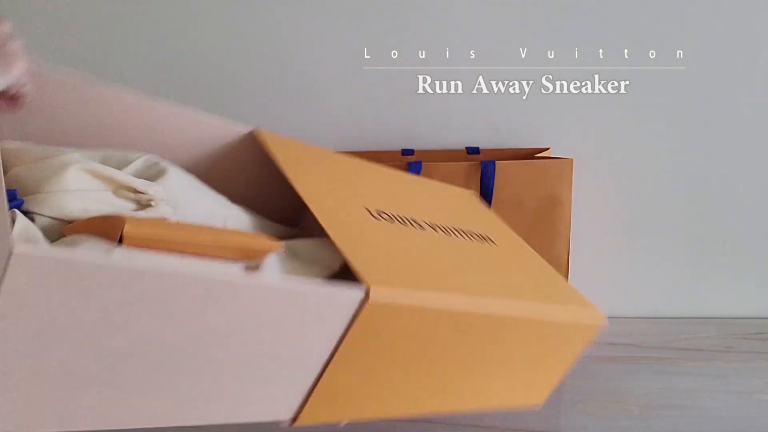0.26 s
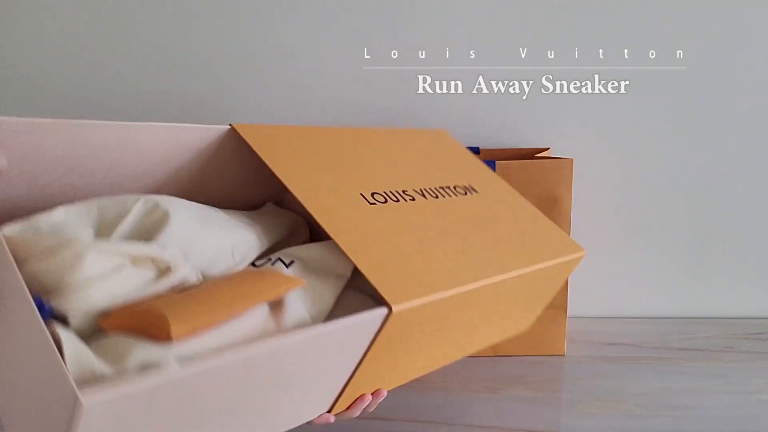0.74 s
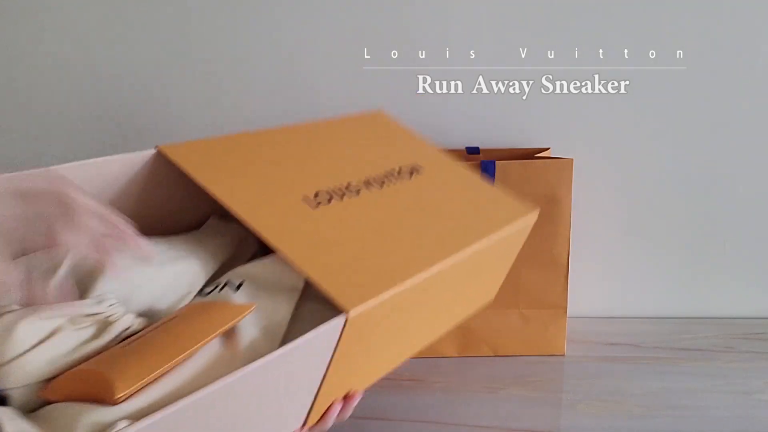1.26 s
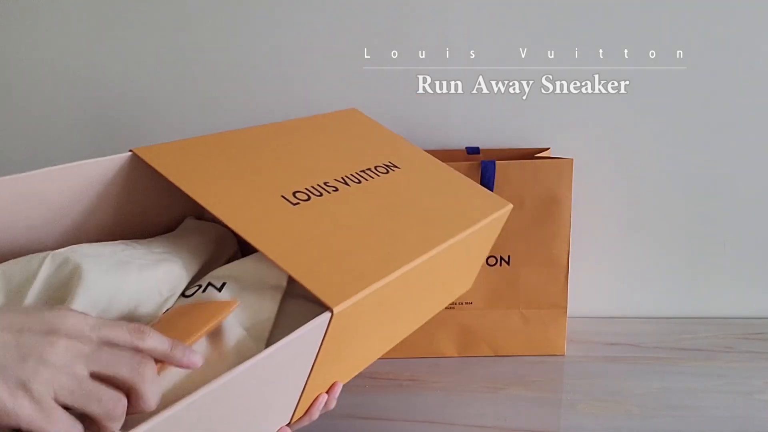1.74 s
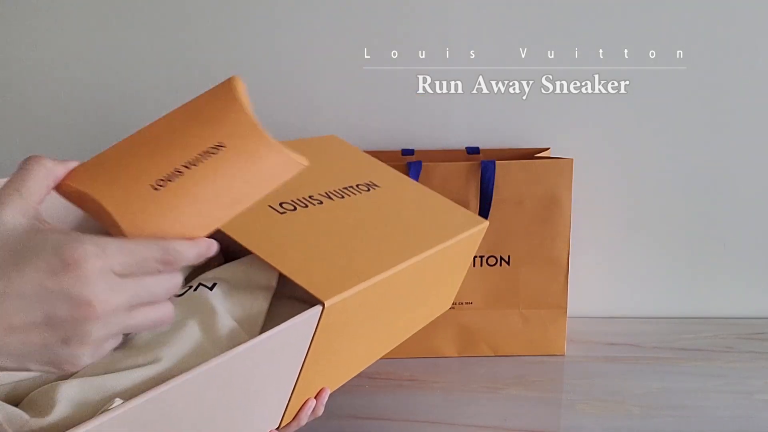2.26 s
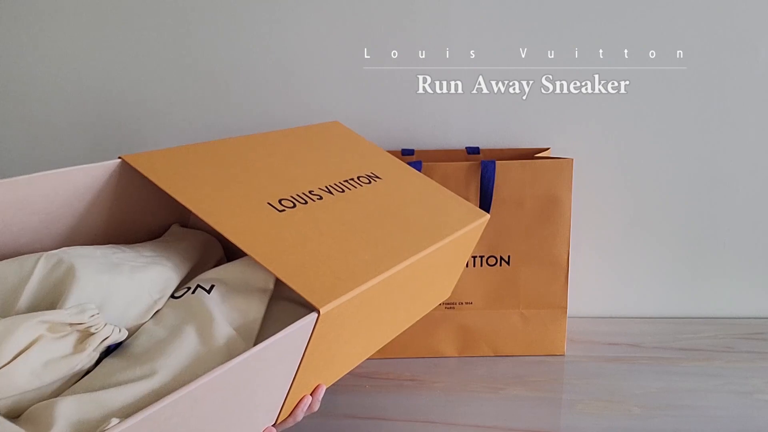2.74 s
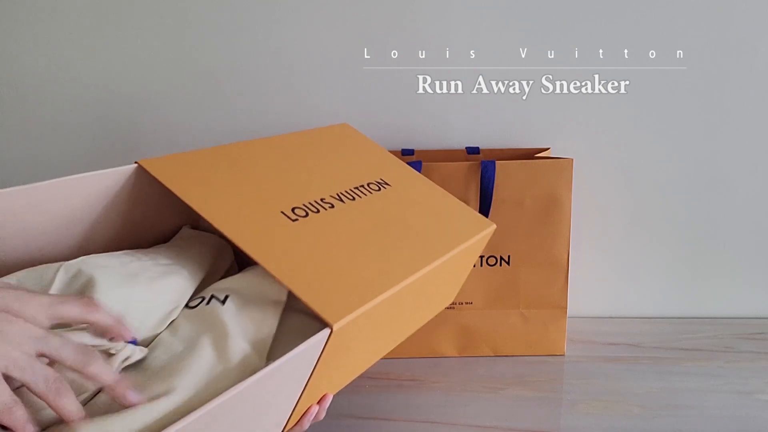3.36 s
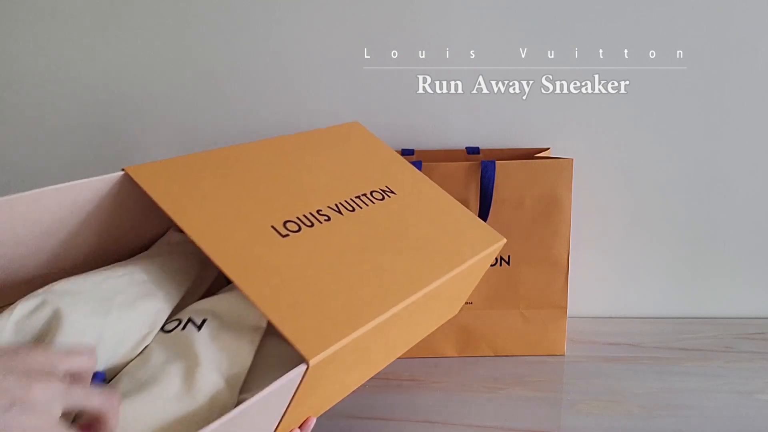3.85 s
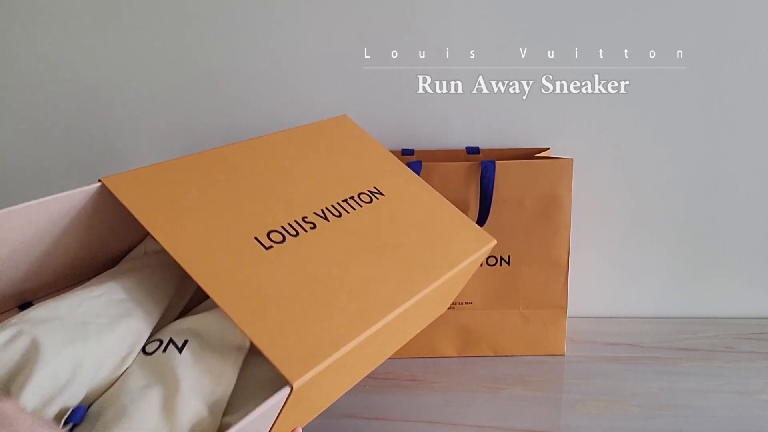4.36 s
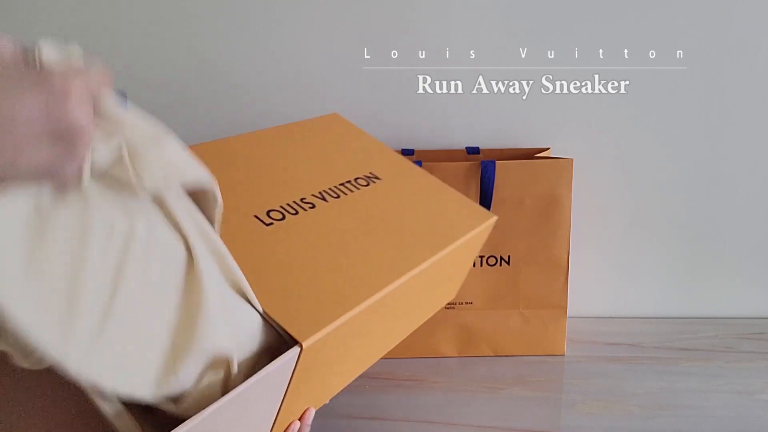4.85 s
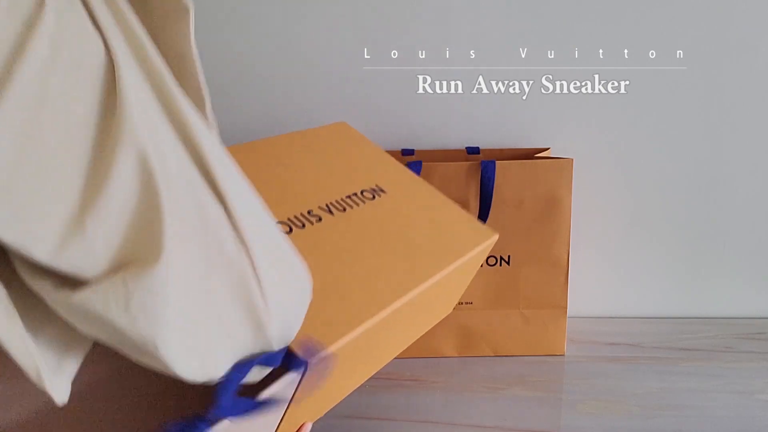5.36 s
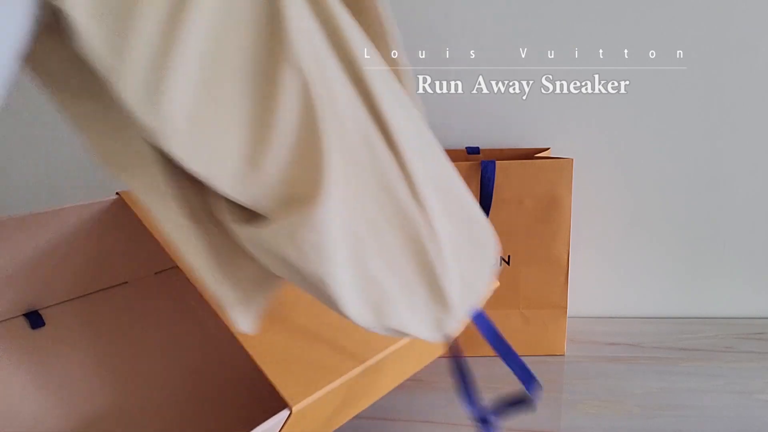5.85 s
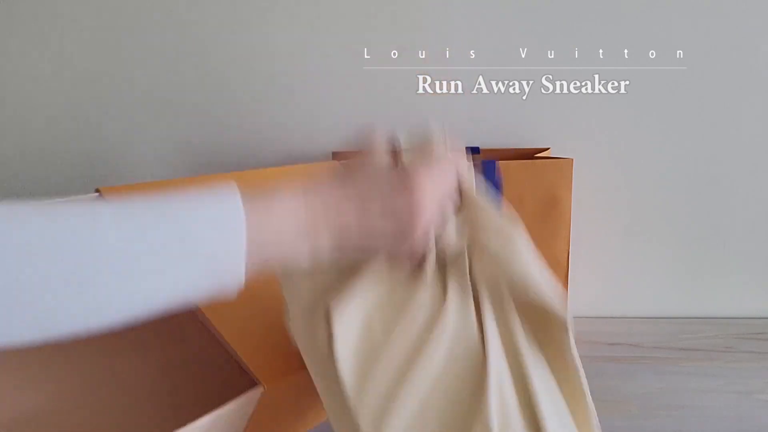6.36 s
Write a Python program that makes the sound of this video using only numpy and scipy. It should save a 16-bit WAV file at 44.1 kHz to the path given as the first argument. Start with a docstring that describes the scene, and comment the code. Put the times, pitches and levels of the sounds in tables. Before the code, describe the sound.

Close handling of a stiff gift box indoors: first a short card-on-card scrape, then small rustles, ticks and dabs of friction. A folded card wallet smacks down on a tabletop and skids. A quieter pause holds soft fabric shifting, one dull thud and a sharp tick, before a cloth bag scuffs along the box wall in bursts, bumping it hollowly. Dry small room, faint rumble, with a dull left side and a crisp right side.

```python
"""A stiff cardboard drawer box is slid open and handled in a quiet room: stick-slip friction and knocks ring its modes.
Card and cloth rub over it as coloured grains of noise: hiss, rasp and grit, with ticks and snags as short puffs.
A small card wallet is lifted out and dropped on the table: ringing modes, crackling clicks and a short skid.
Then a cotton bag is dragged out along the box wall, in separate strokes of friction.
Two unlike microphones: the left one muffled and bassy with a thin hiss of its own, the right one bright."""
import sys
import numpy as np
from scipy import signal
from scipy.fft import rfft, irfft
from scipy.io import wavfile

SR = 44100
rng = np.random.default_rng(int(sys.argv[2]) if len(sys.argv) > 2 else 0)


def transcribe(signal):
    """Save signal, clipped to [-1, 1], as a 16-bit WAV file at the path in sys.argv[1]."""
    frames = np.atleast_2d(signal).T
    limited = np.clip(frames, -1, 1)
    pcm = np.round(limited * 32767).astype(np.int16)
    wavfile.write(sys.argv[1], SR, pcm)


N = 291743

CAVITY_HZ = 370   # hardness tilts the modes around this pitch
INSTANT_DB_PER_S, FLOOR_DB = 1e5, -200   # the rise of a sudden grip; lowest level of a gesture


def amp(db):
    """Decibels to a linear gain."""
    return 10 ** (np.asarray(db) / 20)


def rms_one(x):
    """Scale to an rms of 1."""
    return x / np.sqrt(np.mean(x ** 2) + 1e-20)


def lowpass(order, hz):
    """Butterworth low-pass sections."""
    return signal.butter(order, hz, fs=SR, output="sos")


def in_time(rows):
    """Columns of a curve, one value per sample."""
    s, *columns = np.transpose(rows)
    return [np.interp(np.arange(N) / SR, s, c) for c in columns]


def on_bins(points):
    """A (frequency [Hz], level [dB]) table read at the bins of a short filter."""
    hz, db = np.transpose(points)
    return np.interp(np.log(np.fft.rfftfreq(8192, 1 / SR) + 1), np.log(hz), db)


def colour(x, db):
    """Causal filter of the given response: minimum phase from the folded cepstrum."""
    cepstrum = irfft(np.log(amp(db)))
    half = len(cepstrum) // 2
    cepstrum[1:half] *= 2
    cepstrum[half + 1:] = 0
    impulse = irfft(np.exp(rfft(cepstrum)))[:half]
    return signal.oaconvolve(x, impulse)[:N]


def grains(per_s, spread_db):
    """Random slips of uneven size and sign; rms 1."""
    sizes = amp(spread_db * np.minimum(rng.exponential(1, N), 4))
    signs = rng.choice([-1, 1], N)
    return rms_one(sizes * signs * (rng.random(N) < per_s / SR))


def drift(rate):
    """Slow chance: noise twice through a one-pole low-pass at this rate [Hz]; rms 1."""
    r = np.exp(-2 * np.pi * rate / SR)
    return rms_one(signal.lfilter([1], [1, -2 * r, r * r], rng.standard_normal(N + SR))[SR:])


def swell(s, held, db, rise, fall):
    """One gesture in dB: up at one slope, held, down at another."""
    t = np.arange(N) / SR
    return db - rise * np.maximum(s - t, 0) - fall * np.maximum(t - s - held, 0)


def sudden(s, held, db, fall):
    """Gain of a gesture that grips at once, holds and lets go."""
    return amp(np.maximum(swell(s, held, db, INSTANT_DB_PER_S, fall), FLOOR_DB))


GRIT_BUILDS_S = 0.0072   # the rub gets up to speed


def builds(s):
    """Share of full friction noise while a rub gets up to speed."""
    return 1 - np.exp(-np.maximum(np.arange(N) / SR - s, 0) / GRIT_BUILDS_S)


def ring(force, hz, t60):
    """A two-pole resonator: a unit click sets a sine of height 1 ringing."""
    r, w = amp(-60 / (t60 * SR)), 2 * np.pi * hz / SR
    return signal.lfilter([0, np.sin(w)], [1, -2 * r * np.cos(w), r * r], force + 1e-18)


def tilt(db_per_octave, hz):
    """Hardness of a contact as a level [dB] at one mode."""
    return db_per_octave * np.log2(hz / CAVITY_HZ)


def strike(times, peaks_db, modes, spread_db, tilt_db=0):
    """Each blow strikes every mode with a strength of its own; hard blows favour the high modes."""
    luck = amp(spread_db * rng.standard_normal((len(times), len(modes))))
    out = np.zeros(N)
    for k, (hz, level_db, t60) in enumerate(modes):
        clicks = np.zeros(N)
        heights = amp(peaks_db + level_db + tilt(tilt_db, hz)) * luck[:, k]
        clicks[np.round(times * SR).astype(int)] = heights
        out += (-1) ** k * ring(clicks, hz, t60)   # neighbouring modes start in opposite directions
    return out


def rubbed(level_db, modes, per_s, tilt_db=0):
    """Stick-slip force under the stroke drives the modes; every mode is shaken by its own patch of contact."""
    patches = [grains(per_s, spread_db=5.0) for _ in modes]
    steady = sum(amp(db) * ring(patch, hz, t60) for patch, (hz, db, t60) in zip(patches, modes))
    moving = sum(ring(amp(level_db + db + tilt(tilt_db, hz)) * patch, hz, t60)
                 for patch, (hz, db, t60) in zip(patches, modes))
    return moving / np.std(steady)


def puffs(times, peaks_db, t60, spectrum):
    """Short noise bursts that start at once and die away."""
    t, envelope = np.arange(N) / SR, np.zeros(N)
    for s, db in zip(times, peaks_db):
        envelope += (t >= s) * amp(db - 60 * np.clip(t - s, 0, 1) / t60)
    return envelope * rms_one(colour(rng.standard_normal(N), on_bins(spectrum)))


# drawer pulled out of its sleeve:
# (time [s], ring [dB], low body [dB re ring], hiss [dB], rasp [dB re hiss])
PULL = [(0.0, -49, -21, -67.5, 19), (0.086, -46, -43, -59.5, 13), (0.13, -43, -28.5, -43, 5),
        (0.3, -43.5, -30.5, -40.5, 1.5), (0.345, -47, -26, -57, 7), (0.43, -64, -18, -71, -24)]


def pulling():
    """Columns of the pull, faded away within 0.05 s of the last row."""
    return in_time(PULL + [(PULL[-1][0] + .05, -120, 0, -120, 0)])


# drawer walls damped by the sleeve: (frequency [Hz], level [dB], t60 [s])
SLEEVE_MODES = [(193, 1.5, 0.38), (339, -0.5, 0.2), (425, 9.5, 0.023), (529, -10.5, 0.061),
                (708, 0.5, 0.022), (910, -20, 0.019), (1270, -31, 0.046)]


def drawer():
    """One long scrape of card on card: stick-slip rings the damped walls and the upper body modes."""
    ring_db, low_db, _, _ = pulling()
    walls = rubbed(ring_db, SLEEVE_MODES, per_s=1300.0)
    return walls + rubbed(ring_db + low_db, BODY_MODES[3:], per_s=420.0)


# cloth shifting under the hand, then the bag drawn out: (time [s], hiss [dB])
CLOTH = [(0.4, -69), (0.95, -76), (1.1, -82.5), (1.3, -70.5), (1.54, -91), (1.62, -73.5), (2.1, -81),
         (2.3, -93.5), (2.68, -100), (2.75, -68.5), (3.03, -92), (3.5, -76), (3.92, -75.5), (4.1, -65),
         (4.62, -72), (4.72, -64), (5.2, -65), (5.45, -56.5), (5.95, -83), (6.62, -127)]
# separate rustles, swelling and fading alike: (time at full level [s], held [s], hiss [dB])
RUSTLES = [(0.673, 0.032, -64.5), (1.27, 0.013, -74), (1.625, 0.011, -64.5), (1.73, 0.05, -68.5),
           (1.924, 0.0067, -65.5), (1.98, 0.0067, -64), (2.046, 0.016, -63.5), (2.189, 0.0077, -62.5),
           (3.41, 0.0088, -75), (4.71, 0.065, -68.5), (6.141, 0.01, -66.5), (6.53, 0.049, -70)]
SWELL_DB_PER_S, FADE_DB_PER_S = 418, 354
RASP_DB, RASP_FOLLOWS = -67, 0.27   # cloth rasp at a hiss of -70 dB; share of the hiss swing that it follows
SKID_HISS_DB, SKID_RASP_DB, STROKE_RASP_DB = -29.5, -19, -18   # re force of the slap or stroke


def rubbing_levels():
    """Gains of hiss and rasp: drawer, cloth and rustles, strokes, and the skidding wallet."""
    _, _, drawer_db, drawer_rasp_db = pulling()
    rustles = sum(amp(swell(*row, SWELL_DB_PER_S, FADE_DB_PER_S)) for row in RUSTLES)
    cloth = amp(in_time(CLOTH)[0]) + rustles
    skids = skidding()
    hiss = amp(drawer_db) + cloth + amp(SKID_HISS_DB) * skids
    cloth_rasp = amp(RASP_DB) * (cloth / amp(-70)) ** RASP_FOLLOWS
    stroke_rasp = amp(dragging()[0] + STROKE_RASP_DB)
    rasp = amp(drawer_db + drawer_rasp_db) + cloth_rasp + amp(SKID_RASP_DB) * skids + stroke_rasp
    return hiss, rasp


# spectra of sliding fibres, of coarser card edges and of cotton on card: (frequency [Hz], level [dB per Hz])
HISS_SPECTRUM = [(1180, -11), (2000, 0.5), (2250, -2.5), (3340, -4), (5220, 0), (6090, -0.5), (7480, 7.5),
                 (9190, -12), (12200, -7.5), (15500, -38.5)]
RASP_SPECTRUM = [(100, -32.5), (190, -1), (500, 5.5), (900, -2.5), (1500, -7), (2100, -12), (2900, -27.5),
                 (4500, -42.5)]
DRAG_SPECTRUM = [(530, -16), (900, -6), (1240, -11.5), (1880, -16.5), (2650, -16.5), (4250, -22),
                 (7440, -19), (9090, -27), (13000, -35)]
# fingernail and fold ticks: (time [s], level [dB])
TICKS = [(0.468, -56.5), (0.56, -61.5), (0.756, -64), (0.84, -60), (1.105, -59.5), (1.598, -61),
         (2.181, -53), (2.766, -58), (4.531, -44.5), (5.795, -65)]
# the drawstring snags on the rim: (time [s], level [dB])
SNAGS = [(4.704, -57), (5.727, -52)]
# spectrum of a snag: (frequency [Hz], level [dB per Hz])
SNAG_SPECTRUM = [(1200, -5), (2400, 8), (3800, -18), (9000, -39)]
TICK_T60_S = 0.062
FLUTTER_DB, FLUTTER_HZ = 1, 33   # the contact catches and lets go
GRIT_SPLIT_HZ = 2650   # coarse grit below, fine grit above


def sliding():
    """Fine fibres hiss, coarser card edges rasp, both in uneven jerks; each microphone faces other fibres."""
    hiss_gain, rasp_gain = rubbing_levels()
    flutter = amp(FLUTTER_DB * drift(FLUTTER_HZ))
    fine_gain, coarse_gain = flutter * dragging()[2]
    jerks, sides = amp(1.67 * drift(12.0)), []
    for _ in range(2):
        hiss = rms_one(colour(grains(9000., spread_db=1.5), on_bins(HISS_SPECTRUM)))
        rasp = rms_one(colour(grains(2500., spread_db=2.0), on_bins(RASP_SPECTRUM)))
        drag = rms_one(colour(grains(2500., spread_db=1.5), on_bins(DRAG_SPECTRUM)))
        dull = signal.sosfiltfilt(lowpass(2, GRIT_SPLIT_HZ), drag)
        fibres = jerks * (hiss_gain * hiss + flutter * rasp_gain * rasp)
        grit = fine_gain * (drag - dull) + coarse_gain * dull
        ticks = puffs(*np.transpose(TICKS), TICK_T60_S, HISS_SPECTRUM)
        snags = puffs(*np.transpose(SNAGS), TICK_T60_S, SNAG_SPECTRUM)
        sides.append(fibres + grit + ticks + snags)
    return np.array(sides)


# room tone at the left, then the right microphone: (frequency [Hz], level [dB per Hz])
TONE_LEFT = [(25, -22.5), (45, 13.5), (90, 7.5), (200, -1), (400, -18.5), (800, -31.5), (1300, -49),
             (3000, -38), (7500, -45), (9000, -32.5), (10700, -15.5), (11800, -27), (12800, -46.5)]
TONE_RIGHT = [(40, -11.5), (220, -19.5), (400, -13), (1000, -7), (1700, -18.5), (2500, -114), (5500, -69),
              (7400, -39.5), (8500, -54), (12500, -36), (13500, -63)]
TONE_DB, TONE_SHARED_HZ = -59.5, 382   # rms over both sides; the noise is common below this


def room_tone():
    """Steady rumble common to both sides in the bass; hiss is each microphone's own."""
    common, left, right = rng.standard_normal((3, N))
    low = lowpass(2, TONE_SHARED_HZ)
    left, right = [own + signal.sosfilt(low, common - own) for own in (left, right)]
    tones = [colour(left, on_bins(TONE_LEFT)), colour(right, on_bins(TONE_RIGHT))]
    return amp(TONE_DB) * rms_one(np.array(tones))


# drags along the box wall, the shortest mere dabs:
# (time [s], held [s], force [dB], low body [dB re ring], grit [dB re force])
STROKES = [(0.47, 0.015, -45, -8.5, -15), (0.529, 0.052, -48, -3.5, -17), (0.67, 0.064, -56, 0, -45),
           (0.754, 0.02, -49, -6.5, -18), (0.843, 0.083, -51.5, -10.5, -42), (1.108, 0.012, -56.5, -3, -35),
           (1.405, 0.016, -68.5, 1, -27), (1.577, 0.098, -62.5, -26, -33), (2.174, 0.0029, -51.5, -3, -38),
           (2.76, 0.026, -61, -8.5, -29), (4.074, 0.076, -62.5, -1, -22), (4.668, 0.051, -52, -16, -10),
           (4.784, 0.039, -54, -28, -6.5), (5.028, 0.14, -62.5, -9, -4), (5.256, 0.062, -49.5, -7, -10),
           (5.346, 0.05, -39, -5, -17.5), (5.405, 0.045, -48, -8, -14), (5.462, 0.055, -40.5, 1.5, -15.5),
           (5.721, 0.039, -47.5, -9.5, -15.5), (6.109, 0.1, -43, -13, -16), (6.267, 0.061, -42, -11, -20.5),
           (6.421, 0.082, -44, -9.5, -18), (6.521, 0.14, -42.5, -18, -13.5)]
RELEASE_DB_PER_S, COARSE_RELEASE_DB_PER_S = 913, 392   # letting go; the coarse grit lingers
PRESS_DB_PER_S, GRIT_FADE_DB_PER_S = 13, 97   # during the hold the panels ring more and the fine grit wears off
# the box chatters in the hand after a knock, more if it rocks: level and grit re force
SHUDDER_DB, SHUDDER_DB_PER_S, SHUDDER_FOLLOWS, SHUDDER_GRIT_DB = -15, 285, 1, -18


def dragging():
    """Force [dB] on panels and body, gains of fine and coarse grit: strokes grip at once, hold and let go."""
    force, low, fine, coarse = np.zeros((4, N)) + 1e-7
    for s, held, db, low_db, grit_db in STROKES:
        grip = sudden(s, held, db, RELEASE_DB_PER_S)
        since = np.clip(np.arange(N) / SR - s, 0, held)
        pressed = grip * amp(PRESS_DB_PER_S * since)
        force += pressed
        low += pressed * amp(low_db)
        fine += grip * amp(grit_db - GRIT_FADE_DB_PER_S * since) * builds(s)
        coarse += sudden(s, held, db + grit_db, COARSE_RELEASE_DB_PER_S) * builds(s)
    for s, db, low_db, _ in KNOCKS:
        shudder = sudden(s, 0, db + SHUDDER_DB + SHUDDER_FOLLOWS * low_db, SHUDDER_DB_PER_S)
        force += shudder
        low += shudder * amp(low_db)
        fine += shudder * amp(SHUDDER_GRIT_DB)
        coarse += shudder * amp(SHUDDER_GRIT_DB)
    return 20 * np.log10(force), 20 * np.log10(low), (fine, coarse)


# knocks on the box: (time [s], force [dB], low body [dB re force], hardness [dB per octave])
KNOCKS = [(0.171, -41, -29, -1), (0.241, -36, -8, -2), (0.269, -31.5, -27, 8), (0.303, -33.5, -3.5, -2),
          (1.625, -41.5, 4.5, -11), (3.558, -38, 3.5, -29), (3.571, -45.5, 6, -23), (4.539, -33, -17, 9),
          (5.261, -36.5, -11, -3), (5.286, -37, -20, -17), (5.379, -41, -1, 13), (5.421, -35, -0.5, -11),
          (5.468, -26, -8.5, -12), (5.512, -35, -2.5, -5), (6.512, -24.5, -6, -2), (6.531, -43.5, 12.5, 1),
          (6.543, -27.5, -5.5, -1)]
# box panels and cavity: (frequency [Hz], level [dB], t60 [s])
BOX_MODES = [(317.2, -12.5, 0.13), (368.7, 3, 0.074), (404.3, 0.5, 0.075), (475, -20, 0.073),
             (545.3, -16.5, 0.093), (645, -15.5, 0.085), (753, -11.5, 0.027), (1256, -18, 0.037),
             (1514, -21.5, 0.047), (2000, -26, 0.031)]
# whole box rocking and flexing: (frequency [Hz], level [dB], t60 [s])
BODY_MODES = [(61, -9, 0.22), (119.6, -4, 0.11), (146.4, -5, 0.12), (212.4, 5.5, 0.056), (251, 6, 0.033)]
STROKE_HARDNESS_DB = 2.5   # per octave
BITE_DB = 3   # a stroke starts with a small blow, re force


def box():
    """Panels ring and the body thumps, dragged by stick-slip and knocked by padded blows."""
    force_db, low_db, _ = dragging()
    strokes = rubbed(force_db, BOX_MODES, 1500., STROKE_HARDNESS_DB)
    strokes += rubbed(low_db, BODY_MODES, per_s=270.0)
    s, peak_db, body_db, hardness = np.transpose(KNOCKS)
    knocks = strike(s, peak_db, BOX_MODES, 0.32, hardness)
    knocks += strike(s, peak_db + body_db, BODY_MODES, spread_db=3.0)
    s, _, grip_db, grip_low_db, _ = np.transpose(STROKES)
    knocks += strike(s, grip_db + BITE_DB, BOX_MODES, spread_db=2.5)
    knocks += strike(s, grip_db + BITE_DB + grip_low_db, BODY_MODES, spread_db=4.0)
    return strokes + signal.sosfilt(lowpass(2, 650), knocks)   # padded contact


# card wallet picked up and slapping the table: (time [s], force [dB], crack [dB re force],
# change of the crack at the dip frequency [dB], hardness [dB per octave])
SLAPS = [(2.178, -41, -17, 2, -2), (3.0434, -30.5, -23, -22, -2), (3.0503, -45, 8.5, -23, 3.5),
         (3.069, -40.5, 5, -8, 1.5), (3.181, -56, 17, 5, 10.5), (3.187, -66, 10, -5, -2),
         (3.198, -24.5, -28, -1, -3), (3.2045, -31, 3, 2.5, 5), (3.221, -43.5, 4, -7, 4)]
SKID_RING_DB, SKID_T60_S = -25.5, 0.21   # the wallet skids after a slap: ring re its force


def skidding():
    """Friction after each slap: builds quickly, then dies."""
    return sum(sudden(s, 0, db, 60 / SKID_T60_S) * builds(s) for s, db, *_ in SLAPS)


# wallet and table top: (frequency [Hz], level [dB], t60 [s])
WALLET_MODES = [(245, -22, 0.016), (460, -8, 0.017), (653, -3.5, 0.016), (870, 0, 0.016), (958, 1, 0.017),
                (1137, -3, 0.018), (1246, -2, 0.012), (1553, 1.5, 0.0058)]
# edge of a slap: (frequency [Hz], level [dB per Hz])
CRACK_SPECTRUM = [(700, -16), (1500, -1), (2300, 5), (3000, 5.5), (6400, -0.5), (7900, -12), (9000, -38),
                  (13000, -45)]
DIP_HZ, DIP_OCTAVES = 2810, 0.2   # where a flat landing is hollow
CRACKLE_DB, CRACKLE_T60_S = -24, 0.19   # the edge crackles on after its click


def wallet():
    """A hollow slap, a broad click that crackles on where the edge lands, and a rattle of its faces while it skids."""
    s, peak_db, crack_db, dip_db, hardness = np.transpose(SLAPS)
    octaves = on_bins([(1, 0), (SR, np.log2(SR))])
    dip = np.exp(-(octaves - np.log2(DIP_HZ)) ** 2 / (2 * DIP_OCTAVES ** 2))
    t, cracks = np.arange(SR // 5) / SR, np.zeros(N + SR)
    for start, db, depth in zip(np.round(s * SR).astype(int), peak_db + crack_db, dip_db):
        shape = on_bins(CRACK_SPECTRUM) + depth * dip
        crackle = amp(CRACKLE_DB - 60 * t / CRACKLE_T60_S) * grains(3000, 4)[:len(t)]
        bare_peak = np.max(np.abs(colour(np.ones(1), shape)))   # of the click without crackle
        click = colour((t == 0) + crackle, shape) / bare_peak
        cracks[start:start + len(click)] -= amp(db) * click
    skids_db = 20 * np.log10(skidding() + 1e-9)
    slaps = strike(s, peak_db, WALLET_MODES, 2.5, hardness)
    return slaps + cracks[:N] + rubbed(skids_db + SKID_RING_DB, WALLET_MODES, per_s=500.)


ROOM_T60_S, ROOM_DULL_HZ = 0.35, 5030
ROOM_BUILDS_S, ROOM_SHARED_HZ = 0.0086, 211   # echoes gather; below this both microphones hear the same ones


def room(x):
    """Dense wall echoes, other ones at each microphone above the bass: noise that gathers over a few ms and dies."""
    t = np.arange(SR // 2) / SR
    envelope = amp(-60 * t / ROOM_T60_S) * (1 - np.exp(-(t / ROOM_BUILDS_S) ** 2))
    tail = rng.standard_normal((2, len(t))) * envelope
    tail[0] += signal.sosfiltfilt(lowpass(2, ROOM_SHARED_HZ), tail[1] - tail[0])
    tail = signal.sosfilt(lowpass(1, ROOM_DULL_HZ), tail)
    tail /= np.sqrt(np.sum(tail ** 2, axis=1, keepdims=True))
    return signal.oaconvolve(x[None], tail, axes=1)[:, :N]


SCATTER_HZ, SCATTER_T60_S = 835, .08   # treble above this is scattered


def shielded(x):
    """The left port faces away: treble reaches it only by scattered paths."""
    t = np.arange(SR // 10) / SR
    paths = rng.standard_normal(len(t)) * amp(-60 * t / SCATTER_T60_S)
    scattered = signal.oaconvolve(x, paths / np.sqrt(np.sum(paths ** 2)))[:N]
    return scattered + signal.sosfiltfilt(lowpass(2, SCATTER_HZ), x - scattered)


# left minus right microphone response: (frequency [Hz], level [dB])
LEAN = [(110, 18), (200, 13), (380, 1.5), (700, -3.5), (1050, -9.5), (1600, -11.5), (2400, -19),
        (4400, -29.5), (7500, -44), (10500, -9), (12500, -33), (15000, -49.5)]
RIGHT_LAG_S = 0.0004


def microphones(x):
    """The two responses share out the power of each band: bass to the left, treble to the right, which lags."""
    lean = amp(on_bins(LEAN)) ** 2
    left_db, right_db = 10 * np.log10([lean / (1 + lean), 1 / (1 + lean)])
    late = np.pad(x[1], (round(RIGHT_LAG_S * SR), 0))[:N]
    return 2 * np.array([colour(shielded(x[0]), left_db), colour(late, right_db)])


def scene():
    """Box, friction and wallet in the room, heard by both microphones over the room tone."""
    body, friction, table = box() + drawer(), sliding(), wallet()
    # the table is off to the side, so the room weighs more
    wet = room(amp(-16.0) * (body + friction[1]) + amp(-5.5) * table)
    return microphones(body + friction + table + wet) + room_tone()


BASS_CUT_HZ, CUTOFF_HZ = 36, 15680


def record(dry):
    """The deepest bass and the top are cut."""
    dry = signal.sosfilt(signal.butter(4, BASS_CUT_HZ, "high", fs=SR, output="sos"), dry)
    return signal.sosfilt(signal.ellip(14, .5, 80, CUTOFF_HZ, fs=SR, output="sos"), dry)


dry = scene()
out = record(dry)
transcribe(out)
```